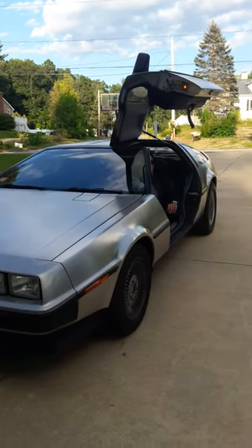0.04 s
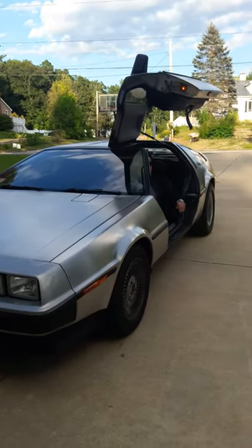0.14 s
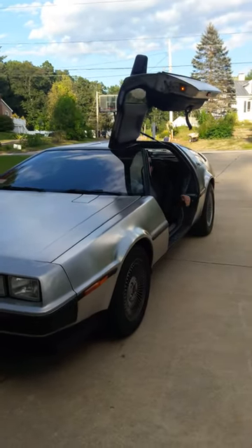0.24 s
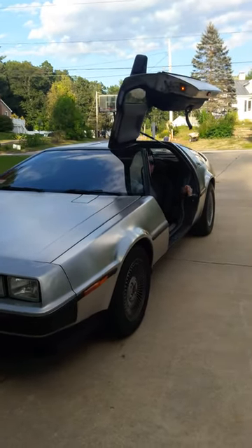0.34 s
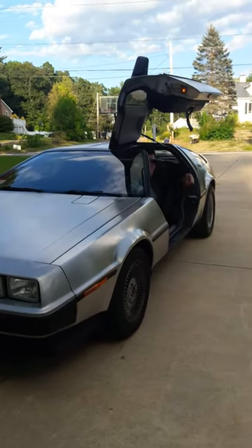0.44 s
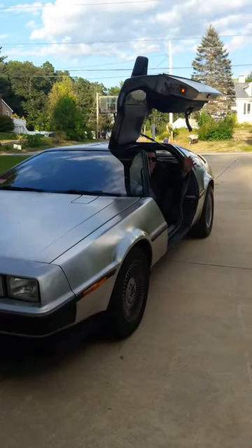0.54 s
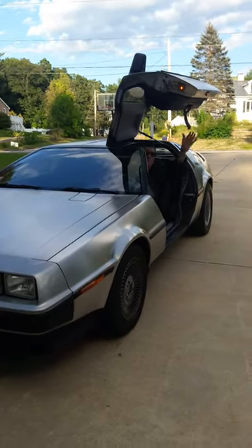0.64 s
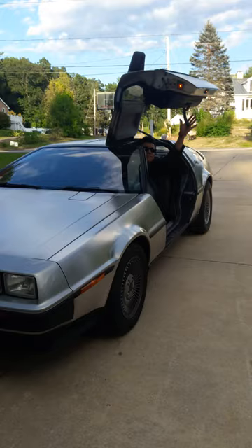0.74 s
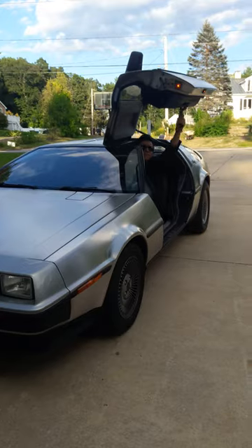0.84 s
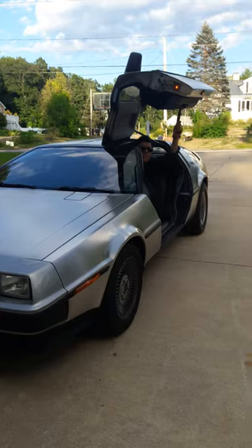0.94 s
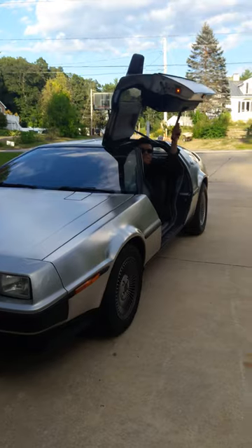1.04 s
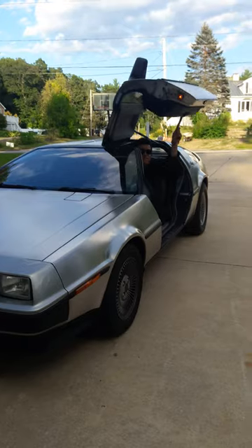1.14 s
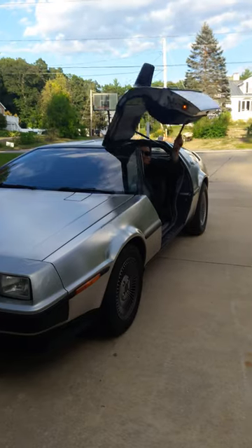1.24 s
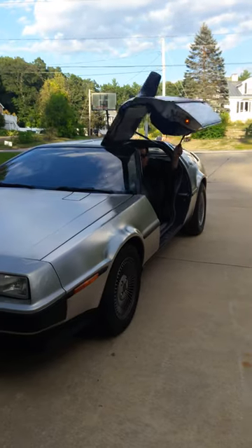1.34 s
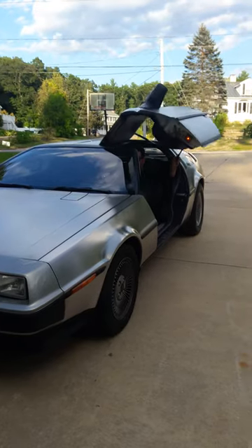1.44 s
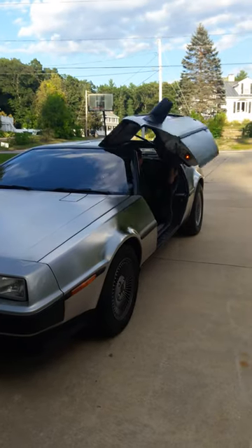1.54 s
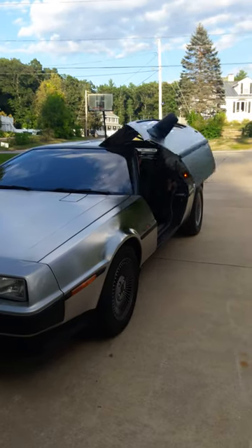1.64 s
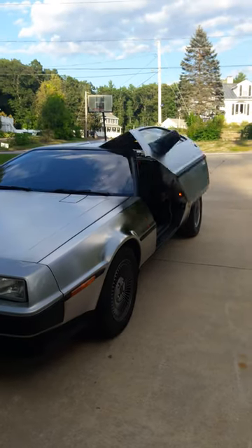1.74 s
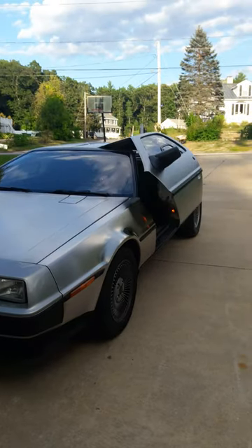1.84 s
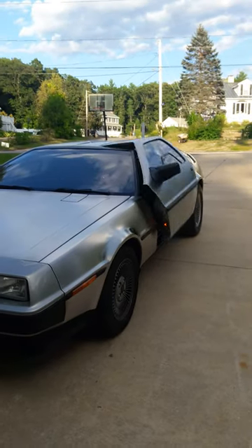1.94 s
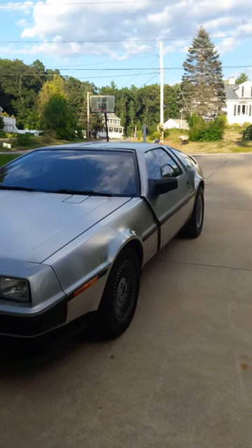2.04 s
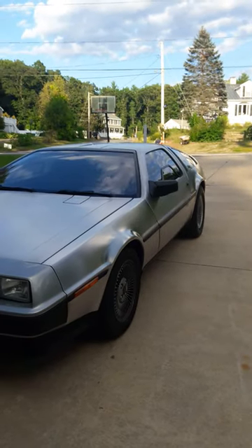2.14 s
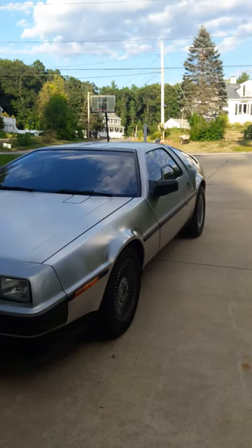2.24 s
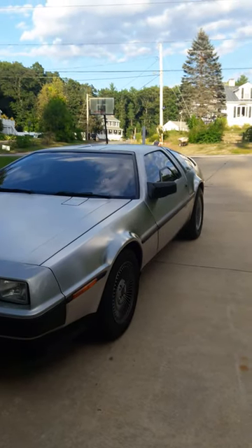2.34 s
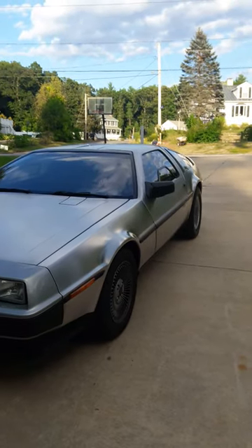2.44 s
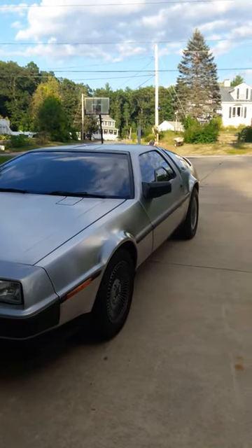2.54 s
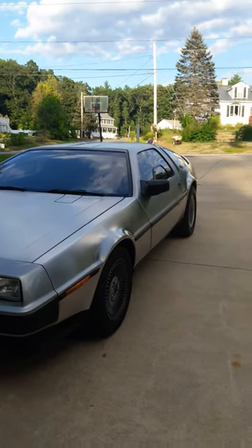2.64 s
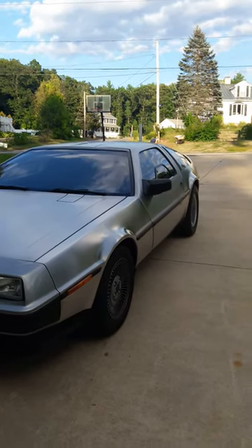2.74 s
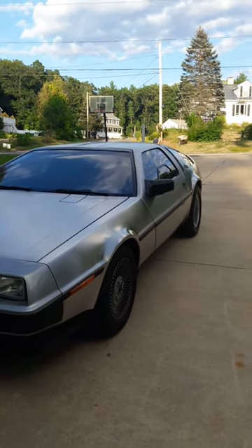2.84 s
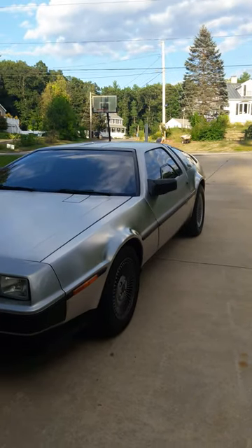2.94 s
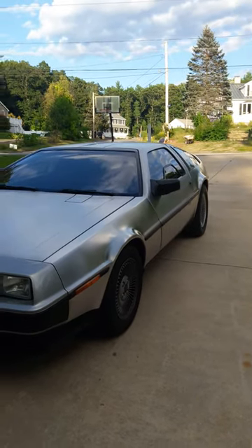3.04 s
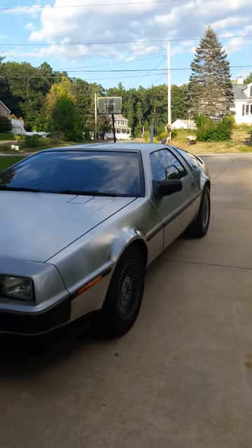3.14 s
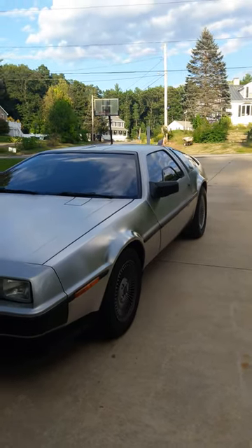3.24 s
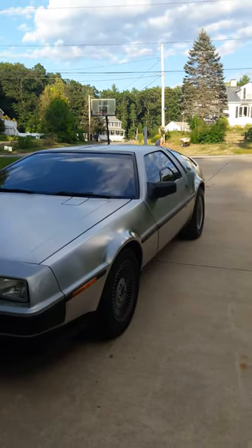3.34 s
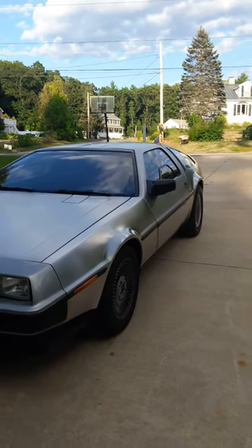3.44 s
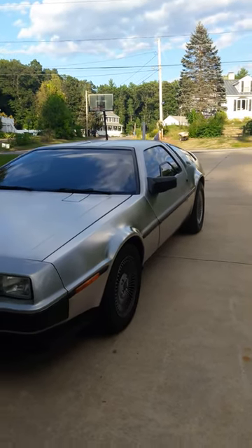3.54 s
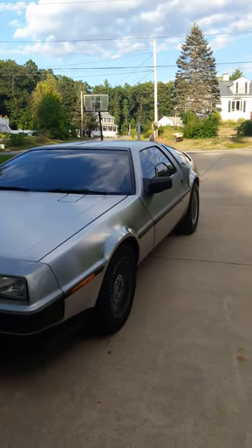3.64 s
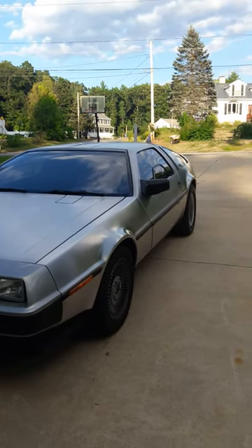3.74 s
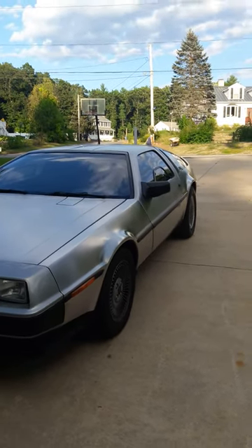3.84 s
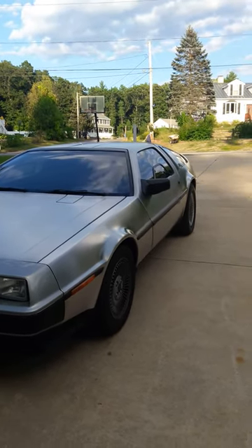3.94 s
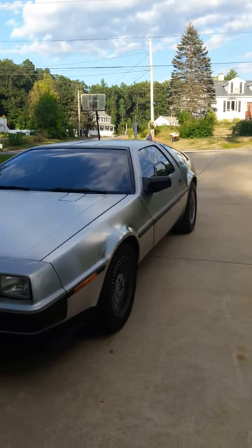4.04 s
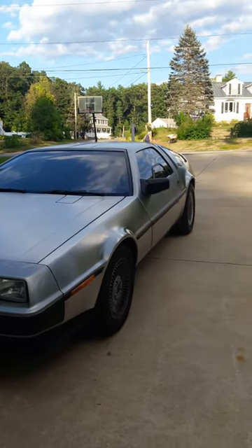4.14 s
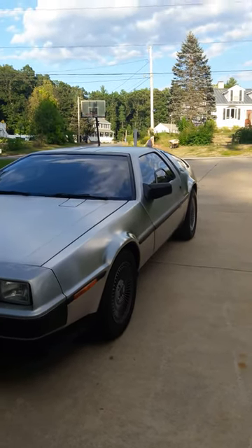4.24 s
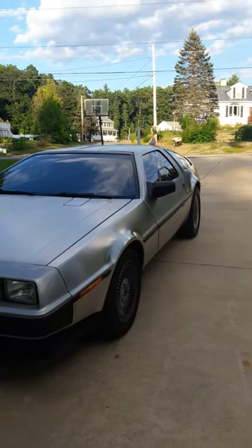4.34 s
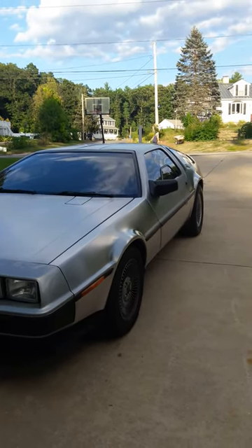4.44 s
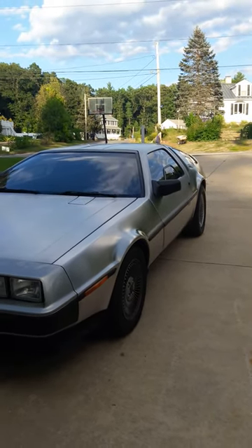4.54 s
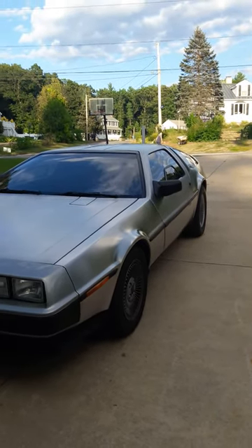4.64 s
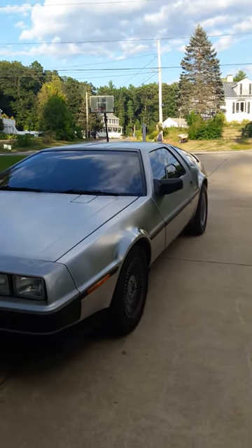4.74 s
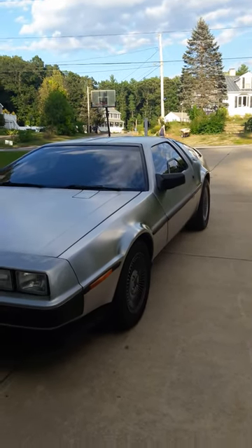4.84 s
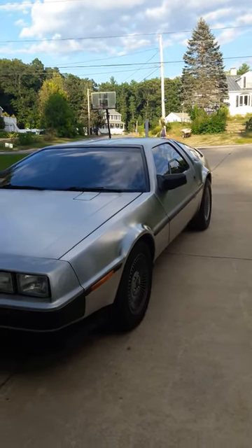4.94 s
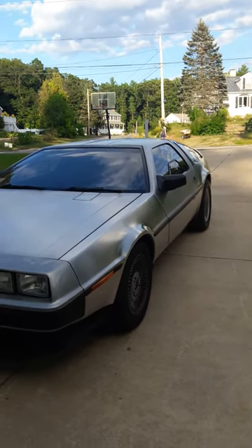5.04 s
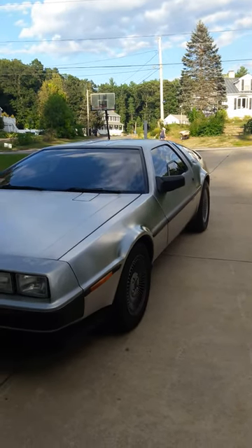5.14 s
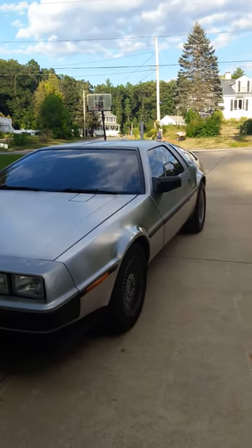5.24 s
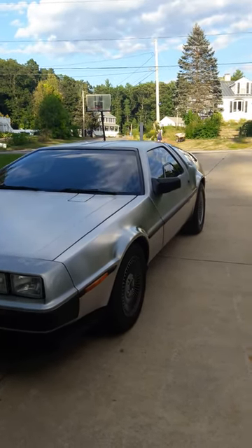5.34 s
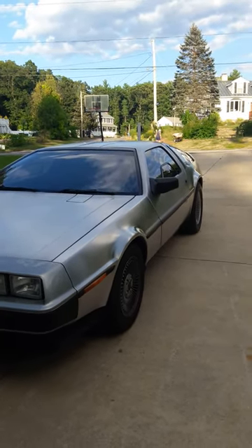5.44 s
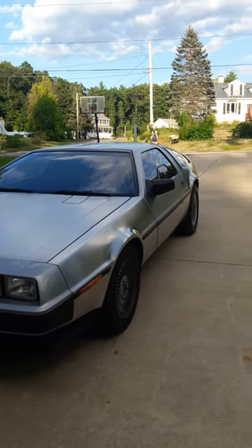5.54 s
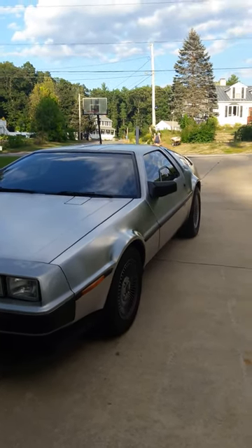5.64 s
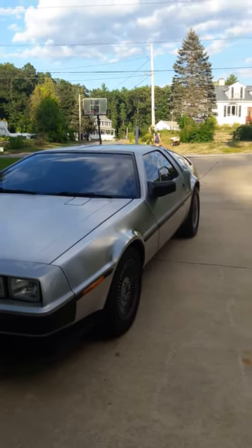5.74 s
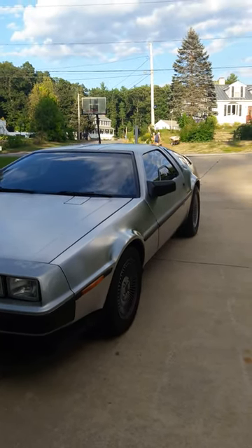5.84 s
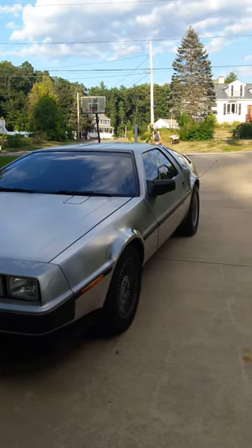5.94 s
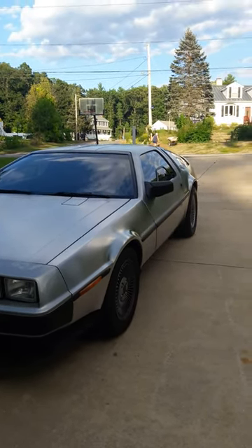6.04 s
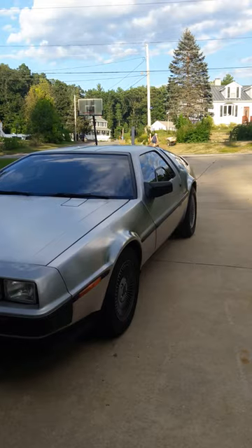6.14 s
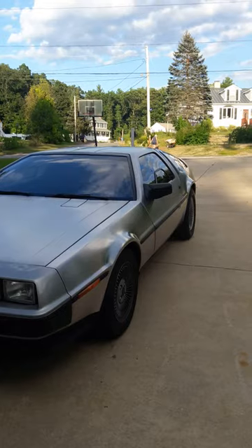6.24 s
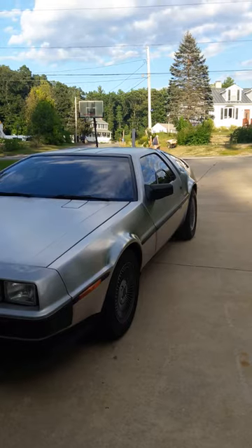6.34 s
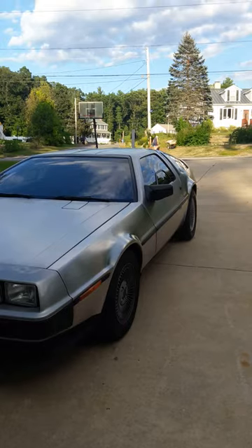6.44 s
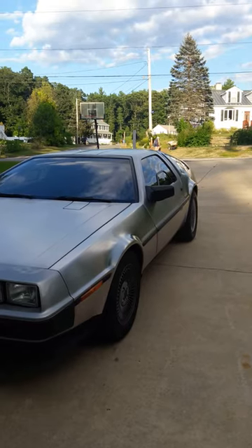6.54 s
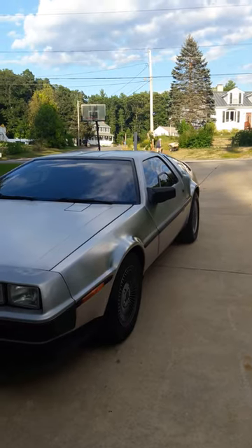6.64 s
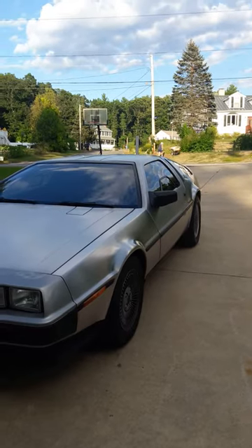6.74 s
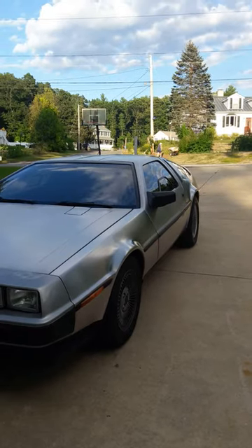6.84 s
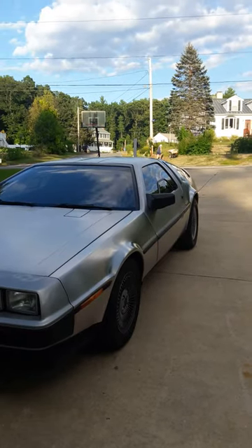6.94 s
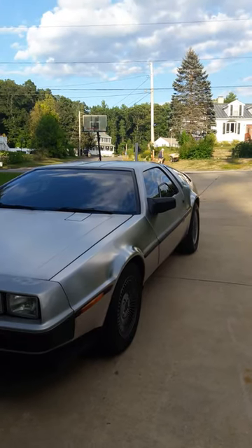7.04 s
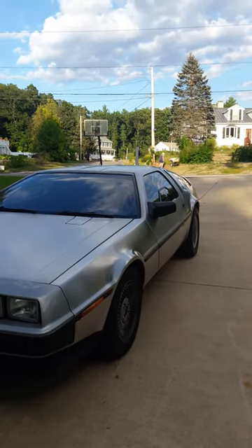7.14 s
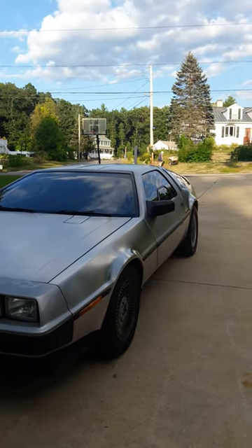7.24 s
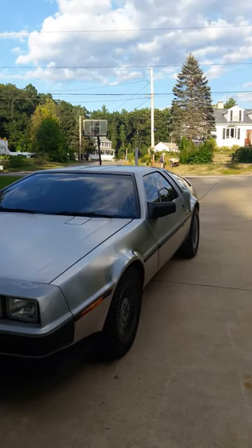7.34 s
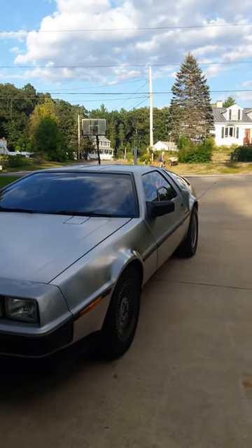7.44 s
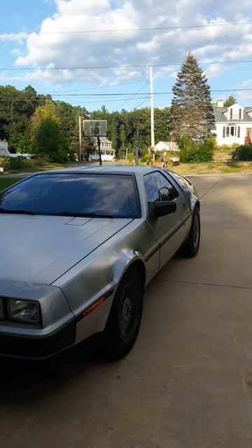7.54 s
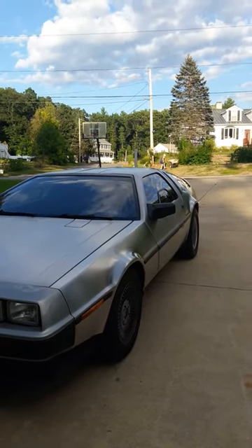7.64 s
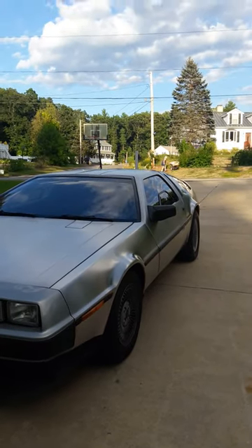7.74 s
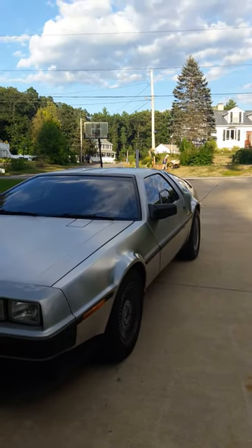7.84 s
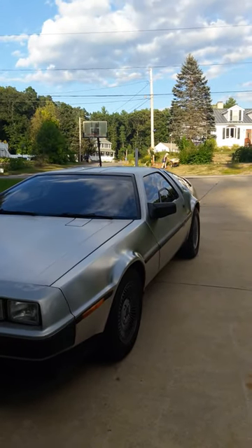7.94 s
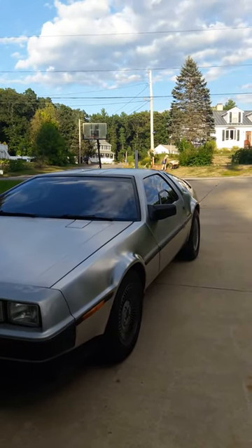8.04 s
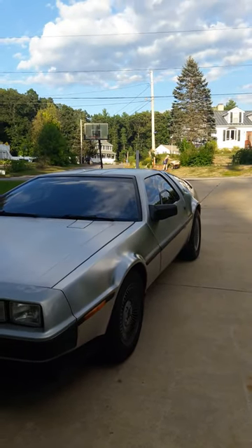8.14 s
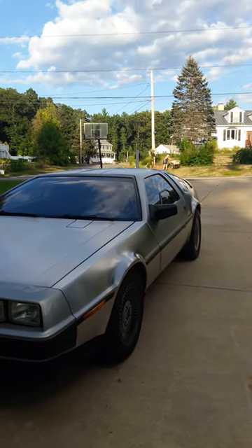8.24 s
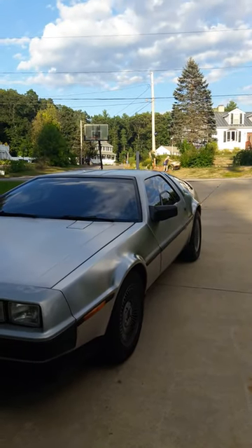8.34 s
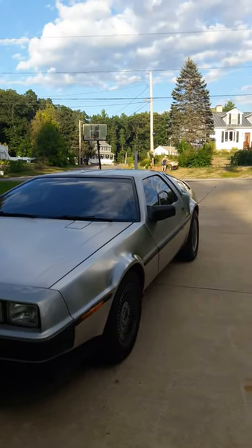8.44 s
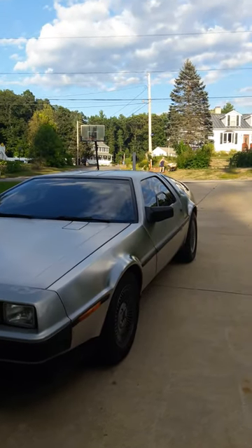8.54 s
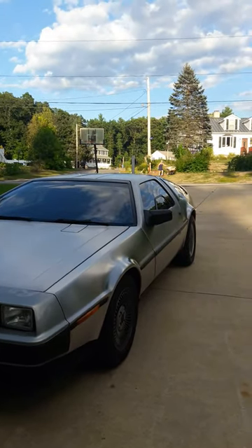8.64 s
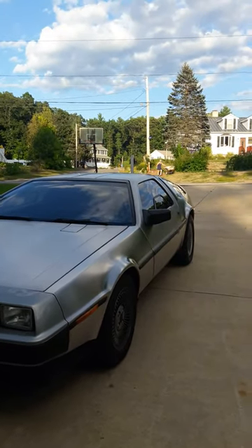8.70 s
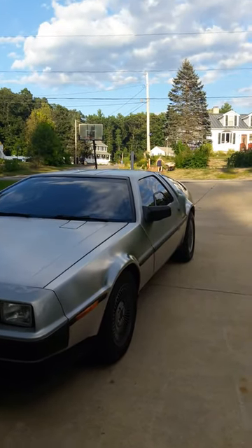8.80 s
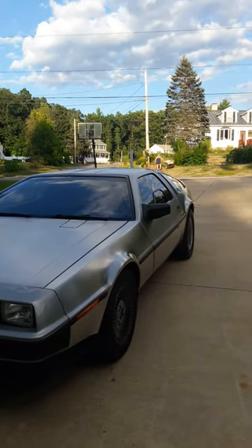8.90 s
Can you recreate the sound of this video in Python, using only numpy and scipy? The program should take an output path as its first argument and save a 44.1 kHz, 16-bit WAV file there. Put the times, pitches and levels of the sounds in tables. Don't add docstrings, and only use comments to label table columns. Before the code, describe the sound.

A dense evening insect chorus with a nearer chirping cricket runs throughout. After about a second, dry hinge creaks and seal rustle begin, ending in a massive multi-hit car door slam just after two seconds. Loose trim shudders, a sharp latch click and small ticks follow; the background dips briefly, then returns with thin bird whistles. Close stereo phone microphone outdoors.

```python
import sys
import numpy as np
from scipy import signal
from scipy.fft import rfft, irfft, next_fast_len
from scipy.io import wavfile
from scipy.ndimage import uniform_filter1d, map_coordinates

SR = 44100
rng = np.random.default_rng(int(sys.argv[2]) if len(sys.argv) > 2 else 0)


def gain_from_db(level_db):
    decades = np.asarray(level_db, float) / 20
    return 10 ** decades


def transcribe(u):
    v = np.clip(np.atleast_2d(u).T, -1, 1)
    q = np.round(v * 32767).astype(np.int16)
    wavfile.write(sys.argv[1], SR, q)


N = 395577

# f/Hz, likeness (1 = same)
ALIKE = [(60, 0.8205), (130, 1), (290, 0.82), (640, 0.77), (1410, 0.18), (3100, -0.11), (6820, -0.075),
         (15000, 0.19)]
# f/Hz, likeness
DOOR_ALIKE = [(60, 1), (180, 0.996), (550, 0.93), (1650, 0.099), (4970, 0.087), (15000, -0.24)]
SLAM_S = 2.114
LEFT_RIGHT = np.array([[1], [-1]])


def unit(x):
    return x / np.sqrt(np.mean(x ** 2) + 1e-20)


def along(points, hz):
    f, v = np.transpose(points)
    return np.interp(np.log(hz + 1), np.log(f + 1), v)


def wobble(rate):
    knots = rng.standard_normal(int(N * rate / SR) + 4)
    return map_coordinates(knots, [np.arange(N) * rate / SR])


def filtered(x, response):
    m = next_fast_len(x.shape[-1] + 4096)
    gain = response(np.fft.rfftfreq(m, 1 / SR))
    return irfft(rfft(x, m) * gain, m)[..., :x.shape[-1]]


def rush(spectrum, alike, size=N):
    def shape(hz):
        turn = np.arccos(np.clip(along(alike, hz), -1, 1)) / 2
        return gain_from_db(along(spectrum, hz)) * [np.cos(turn), np.sin(turn)]
    mid, side = filtered(rng.standard_normal((2, size)), shape)
    return unit(np.array([mid + side, mid - side]))


def fading(x, t60s):
    t, out = np.arange(x.shape[-1]) / SR, 0
    for hz in 62.5 * 2. ** np.arange(9):
        octave = lambda f: np.cos(np.pi / 2 * np.clip(np.log2((f + 1) / hz), -1, 1)) ** 2
        out = out + filtered(x, octave) * gain_from_db(-60 * t / along(t60s, hz))
    return out * (1 - np.exp(-t / 0.0014))


def add(track, s, sound):
    part = track[:, round(s * SR):][:, :sound.shape[-1]]
    part += sound[..., :part.shape[1]]


def lean(x, balance):
    return filtered(x, lambda hz: gain_from_db(along(balance, hz) / 2 * LEFT_RIGHT))


def glide(pitch, lead):
    return np.sin(2 * np.pi * np.cumsum(pitch) / SR + np.array([[0], [lead]]))


def slam():
    # t/s, panel level/dB, boom/dB and latch/dB against the panel
    contacts = [
        (2.1135, -21, -5, -26),
        (2.1162, -13, -6, -13.5),
        (2.134, -11, -4.5, -11.5),
        (2.1445, -12.5, 9, -7),
        (2.163, -14.5, -1, -8),
        (2.1855, -19, 12.5, -5),
        (2.206, -18, 1, -12),
        (2.258, -33.5, 1.5, -12.5),
        (2.329, -50, -7.5, -11.5),
        (2.38, -43, 7.5, -12.5),
    ]
    # f/Hz, level/dB, ring time/s (each contact fades 60 dB in 0.35 of it)
    shell_modes = [(68.8, -16.5, 0.99), (97.2, -3, .6), (120, -7.5, 0.55), (152.7, 3, 0.53),
                   (180.2, 2, 0.35), (226, -0.5, 0.39), (250, -8.5, 0.54), (272.4, -2, 0.43),
                   (315.77, -3, 0.3326), (411.3, -12, 0.59), (450, -13, 0.26)]
    # f/Hz, level/dB per Hz
    panel = [(260, -10.5), (450, -5), (558, -4.5), (734, -8.5), (821, -2.5), (1000, -11), (1180, -5.5),
             (1340, -11.5), (1480, -7.5), (2020, -13), (2220, -12), (3500, -24.5), (4550, -52.5),
             (7700, -120)]
    # f/Hz, level/dB per Hz
    latch_colour = [(1470, -49), (2500, -6.5), (3620, -6.5), (4570, -2.5), (5380, -6), (6680, -3.5),
                    (7620, -10), (8110, -16), (10600, -21), (12000, -20), (15900, -29.5)]
    # f/Hz, time to fade 60 dB/s
    dying = [(300, 0.21), (1000, 0.17), (3000, 0.078), (7000, 0.17), (10000, .15), (14000, 0.097)]
    shell, rattle, size = np.zeros((2, N)), np.zeros((2, N)), int(.9 * SR)
    t = np.arange(size) / SR
    for s, db, boom_db, latch_db in contacts:
        boom = 0
        for hz, level, t60 in shell_modes:
            fade = gain_from_db(level + rng.normal(0, 5.08) - 60 * t / (0.35 * t60))
            phase = rng.uniform(0, 6.3) + .1 * LEFT_RIGHT * np.sin(hz / 9)
            boom = boom + fade * np.sin(2 * np.pi * hz * t + phase)
        crack = 1 + 1.5 * gain_from_db(-60 * t / 0.021)
        latch = gain_from_db(latch_db) * crack * rush(latch_colour, DOOR_ALIKE, size=size)
        add(shell, s, gain_from_db(db + boom_db - 11) * boom * (1 - np.exp(-t / 0.0019)))
        add(rattle, s, gain_from_db(db - 5.0) * fading(rush(panel, DOOR_ALIKE, size=size) + latch, dying))
    crunch = gain_from_db(1.5 * wobble(260))
    return shell + rattle * crunch


def pings(rows, rise_s, lead):
    out, t = np.zeros((2, N)), np.arange(int(.08 * SR)) / SR
    for s, db, hz, t60 in rows:
        fade = gain_from_db(db + 1 - 60 * t / np.clip(t60, .003, .1)) * (1 - np.exp(-t / rise_s))
        add(out, s, fade * np.sin(2 * np.pi * hz * t + np.array([[0], [lead * hz / 1000]])))
    return out


def latch_bites():
    # t/s, peak level/dB, f/Hz, time to fade 60 dB/s
    bites = [(2.1168, -19, 2280, .03), (2.1205, -16.5, 1150, 0.02495), (2.12, -20.5, 110, .1),
             (2.126, -14, 160, .08), (2.136, -17, 105, .1), (2.228, -24, 105, .1), (2.14, -18, 440, .06),
             (2.118, -19, 4130, 0.022), (2.1175, -22, 7200, .02), (2.1195, -16.5, 1030, 0.045),
             (2.146, -13, 820, 0.0535), (2.149, -21, 1474, .04), (2.1475, -21, 360, .02),
             (2.165, -17, 790, .015), (2.162, -19.5, 1171, 0.048), (2.164, -18.5, 543, 0.06),
             (2.204, -28, 621.3, 0.054), (2.205, -28, 1075, .04), (2.218, -16, 253, 0.06),
             (2.195, -17, 160, .08), (2.272, -39, 600, 0.057), (2.196, -24.5, 7447, .01),
             (2.1345, -18, 6480, .03), (2.1395, -20.5, 7300, .015), (2.1445, -19, 4594, 0.027),
             (2.1448, -19, 6518, .03), (2.1645, -28, 4710, 0.017), (2.1855, -18, 6170, 0.017),
             (2.186, -22, 7500, .02), (2.187, -27, 5200, .015), (2.258, -42.5, 5067, 0.0285),
             (2.1, -46.5, 2100, 0.03402), (2.6183, -22.5, 6800, 0.0037), (2.6184, -36, 8600, .004),
             (2.6191, -36, 9200, .004), (2.6184, -35, 4450, .004), (2.6191, -38, 4100, .004),
             (2.6195, -50, 780, 0.046), (2.6191, -42, 10800, .004), (2.6184, -46, 1800, .005),
             (2.6184, -37, 10300, .004), (2.6184, -40, 12200, .004), (2.6184, -50, 14300, .004),
             (2.6191, -21, 7140, 0.0045), (2.6185, -33, 5343, 0.0088), (2.6186, -41.5, 3780, 0.01036),
             (2.6186, -45, 2726, 0.01215), (2.6205, -43, 5800, .01), (2.4, -43.5, 4960, 0.010306),
             (2.629, -49, 1165, 0.0318), (2.4, -43, 4300, .006), (2.6343, -34, 5800, .006)]
    return pings(bites, rise_s=0.00051, lead=0.19) * gain_from_db(2.0 * wobble(400))


def creaks():
    # t/s, peak level/dB, low knock/dB
    slips = [(1.054, -49, -9), (1.073, -45.5, -10), (1.107, -60, 0), (1.149, -51, -1), (1.174, -47.5, -4.5),
             (1.19, -46.5, -11), (1.208, -48.5, -8), (1.23, -48, -11.5), (1.327, -49.5, -5.5),
             (1.433, -48.5, -0.5), (1.465, -69.5, 13.5), (1.571, -45.5, 0), (1.612, -54.5, -1),
             (1.682, -45.5, 2.5), (1.742, -49, -5.5), (1.784, -43, -9.5), (1.819, -54.5, -5.5),
             (1.866, -61, -16), (1.962, -42, -5.5), (2.014, -49.5, -3), (2.06, -54, -12.5)]
    # f/Hz, width/Hz, level/dB
    hinge_modes = [(327, 165.51, 1.5), (445, 153, 3), (687, 206, -0.5), (1170, 180, -4.5),
                   (1630, 100, -2.5)]
    edge_colour = [(1800, -25.5), (2800, -6.5), (6000, -6), (12000, -29.0), (15000, -49)]  # f/Hz, level/dB
    squeak_db, edge_db = -9.5, -10.5
    out, size = np.zeros((2, N)), int(.1 * SR)
    t = np.arange(size) / SR
    for s, db, knock_db in slips:
        fade = (gain_from_db(-60 * t / 0.048) + 0.31 * gain_from_db(-60 * t / 0.27)) * (1 - np.exp(-t / .0008))
        jolts = rush([(100, 0), (15000, 0)], DOOR_ALIKE, size=size) * fade
        weight = [(500, knock_db + 7.0), (650, 0), (1250, 0), (1500, squeak_db + 6.0)]

        def hinge(f):
            total = 0
            for k, (c, w, level) in enumerate(hinge_modes):
                ring = 1j * f * w / (c * c - f * f + 1j * f * w)
                total = total + (-1) ** k * gain_from_db(level + along(weight, c)) * ring
            return total

        edge = filtered(jolts, lambda f: gain_from_db(along(edge_colour, f)))
        add(out, s, gain_from_db(db + 14.5) * filtered(jolts, hinge) + gain_from_db(db + edge_db + 12.0) * edge)
    return out


def squeaks():
    # t/s, peak level/dB, f/Hz, time to fade 60 dB/s
    seal = [(1.067, -52, 500, .03), (1.074, -42, 1170, 0.03), (1.075, -54.5, 1700, .03),
            (1.19, -46, 1630, .03), (1.191, -45, 727.2, 0.0345), (1.23, -44.5, 1597, 0.0387),
            (1.232, -40.5, 700, .03), (1.328, -50, 1699, 0.0358), (1.431, -48.5, 1766, 0.02313),
            (1.571, -51.5, 3750, 0.027), (1.575, -42.5, 400, 0.051), (1.432, -45.5, 620, 0.046),
            (1.463, -47, 450, .05), (1.866, -49.5, 900, 0.032), (1.633, -48.5, 979.7, 0.031),
            (1.682, -48, 1680, 0.0413), (1.741, -44.5, 1760, 0.02677), (1.785, -51.5, 3530, 0.03223),
            (1.799, -55.5, 2800, .02), (1.962, -50.5, 1736, .03), (1.962, -48, 2550, 0.0243),
            (1.962, -45, 800, 0.0324), (1.973, -41.5, 690, 0.041), (2.014, -51, 1670, 0.03536),
            (2.06, -51.5, 1688, .03)]
    return pings(seal, rise_s=0.0008, lead=0.52)


def rub():
    # t/s, level/dB
    drag = [(1.03, -83.5), (1.07, -55), (1.12, -63), (1.15, -57), (1.19, -55), (1.25, -60), (1.3, -88),
            (1.5, -73), (1.58, -57), (1.8, -57.5), (1.9, -75), (2.1, -61.5), (2.12, -95)]
    body = [(150, -26), (330, 2.5), (700, -3), (1170, -4.5), (1650, -11.5), (2200, -22), (6000, -35), (9000, -58)]
    level_db = np.interp(np.arange(N) / SR, *np.transpose(drag), left=-120, right=-120)
    return gain_from_db(level_db + 2.9 * wobble(70)) * rush(body, DOOR_ALIKE)


def ticks():
    # t/s, peak level/dB, bright part/dB, left minus right/dB
    snaps = [(2.6191, -49, 10.5, -3.5), (2.6222, -59, 8, 0), (2.6272, -59, 7, -3), (2.6315, -61, 9, -2),
             (2.651, -51, -14.5, -4), (2.8536, -47.5, -7, -4), (2.8934, -45.5, -10.5, -2.5),
             (2.9142, -47.5, -10.5, -10), (2.9172, -54, -8, -8), (2.838, -56, -15, -3),
             (2.972, -58, -15, -4), (3.411, -58, -6, -6), (3.384, -54.5, -16.5, -8.5),
             (3.0335, -51, -15, -1), (3.3872, -51.5, -18.5, -7), (3.469, -46.5, -19.5, -10.5),
             (3.583, -41, -9.5, -10.5), (3.5904, -68, -1.5, -5), (3.6094, -72, 1.5, -3.5),
             (4.854, -65, 8, -1.5)]
    click_tones = [(1250, -9), (2200, 1.5), (2750, -2.0), (4300, -4.5)]
    bright = [(2500, -2.5), (4300, -21.0), (6500, 11.5), (9000, -8.5), (13000, -22.5), (15500, -32)]
    out, t = np.zeros((2, N)), np.arange(int(0.028 * SR)) / SR
    for s, db, bright_db, pan_db in snaps:
        click = sum(gain_from_db(level - 60 * t / 0.0043) * np.sin(2 * np.pi * hz * t) for hz, level in click_tones)
        click = click * (1 - np.exp(-t / 0.00015))
        crack = rush(bright, DOOR_ALIKE, size=len(t)) * gain_from_db(bright_db + 5.5 - 60 * t / 0.0082)
        add(out, s - .0005, gain_from_db(db + 1.5 + pan_db / 2 * LEFT_RIGHT) * (click + crack))
    return out


def hum():
    after = np.clip(np.arange(N) / SR - SLAM_S, 0, None)
    return gain_from_db(-59.5 - 60 * after / 4.0 + 3.5 * wobble(13)) * np.sin(2 * np.pi * 294.21 * after)


def knocks():
    # t/s, peak level/dB, f/Hz
    hand = [(0.004, -42, 110), (.045, -44, 55), (.105, -48, 65), (0.153, -43, 104.7), (.242, -42.5, 50),
            (.328, -43, 70), (0.22, -44, 91), (0.279, -34, 91.23), (0.297, -39, 140.1), (0.376, -40, 98.33),
            (0.469, -39, 126.6), (0.482, -36.5, 84.6)]
    # t/s, peak level/dB, f/Hz
    taps = [(0.195, -46, 652.4), (0.216, -45, 399.2), (0.408, -45, 273), (0.632, -43.5, 283),
            (0.848, -42, 300.7), (0.939, -47, 226), (2.66, -51, 250), (2.72, -49, 230), (2.826, -48, 250),
            (2.848, -48.5, 271), (4.095, -44.5, 250), (7.483, -45, 910), (7.59, -43, 85), (7.603, -39, 240),
            (7.606, -49, 400), (7.89, -48, 192), (8.309, -42, 334), (8.591, -47.5, 180), (8.839, -44, 250)]
    # t/s, peak level/dB, f/Hz
    shudder = [
        (2.232, -21, 62),
        (2.29, -31, 100),
        (2.327, -26.5, 193),
        (2.377, -31, 226),
        (2.398, -31, 97),
        (2.467, -37, 85.4),
        (2.55, -46, 160),
        (2.65, -44, 110.3),
        (2.69, -47.5, 165),
        (2.835, -43.5, 148),
    ]
    out, t = np.zeros((2, N)), np.arange(int(.2 * SR)) / SR
    for rows, pan_db in [(hand, 15), (taps + shudder, 1.5)]:
        for s, db, hz in rows:
            t60 = 0.062 * (100 / hz) ** 0.359
            dull = [(hz / 2, -12), (hz, 0), (4 * hz, -9), (16 * hz, -34), (48 * hz, -120)]
            puff = gain_from_db(-14.5) * rush(dull, DOOR_ALIKE, size=len(t))
            fade = gain_from_db(db + 5.0 - 60 * t / np.clip(t60, .01, 1)) * (1 - np.exp(-t / 0.00377))
            add(out, s, gain_from_db(pan_db / 2 * LEFT_RIGHT) * fade * (np.sin(2 * np.pi * hz * t) + puff))
    return out


def yard(x):
    # f/Hz, time to fade 60 dB/s
    echo_fade = [(100, 0.81), (250, 0.86), (1000, 0.7566), (4500, 0.67), (7000, .75), (14000, 0.29)]
    tail = fading(rush([(50, 0.5), (300, -7.5), (8000, 0.0), (15000, 3.0)], DOOR_ALIKE, size=SR), echo_fade)
    late = np.pad(x.mean(0), (1500, 0))[None]
    return signal.fftconvolve(late, tail / np.linalg.norm(tail[0]), axes=1)[:, :N]


def cricket():
    chirps = [.092, .433, .882, 1.325, 1.719, 2.661, 3.087, 3.789, 4.122, 4.486, 4.865, 5.212, 5.559, 5.948,
              6.437, 6.751, 7.119, 7.51, 7.847, 8.234, 8.626]
    out, t = np.zeros((2, N)), np.arange(int(0.037 * SR)) / SR
    stroke = np.sin(2 * np.pi * (4240 * t - 1500 * t * t) + np.array([[0], [1.5]])) * np.hanning(len(t))
    levels = rng.normal(-15, 1.2, (len(chirps), 3))
    for s, stroke_db in zip(chirps, levels):
        for k in range(3):
            db = 9.0 - 2.0 * (k == 0) + stroke_db[k]
            add(out, s - .014 + .045 * k, gain_from_db(db + 1.2 * LEFT_RIGHT) * stroke)
    return out


def bird():
    # t/s, start f/Hz, end f/Hz, arch/Hz, level/dB
    song = [
        (3.68, 3540, 3600, 60, -74),
        (3.7, 3180, 3230, 60, -77),
        (3.83, 3200, 3330, -40, -77),
        (3.925, 3520, 3400, 300, -73),
        (3.96, 3400, 3350, -60, -78),
        (4.127, 3600, 3700, 90, -74),
        (4.16, 3420, 3480, -130, -72),
        (4.41, 3200, 3330, 120, -75),
        (4.408, 3620, 3480, 90, -76),
    ]
    out, waver = np.zeros((2, N)), 40 * wobble(27) + 40 * wobble(70)
    u = np.linspace(0, 1, int(0.142 * SR))
    for s, start_hz, end_hz, arch_hz, db in song:
        pitch = start_hz + (end_hz - start_hz) * u + arch_hz * np.sin(np.pi * u) ** 0.71
        pitch = pitch + waver[round(s * SR + start_hz):][:len(u)]
        add(out, s, gain_from_db(db + 8.5) * glide(pitch, 1.6) * np.sin(np.pi * u) ** 0.35)
    return out * gain_from_db(-6 + 4 * wobble(40))


def whistles():
    # t/s, length/s, start f/Hz, end f/Hz, level/dB
    glides = [
        (1.118, 0.048, 9480, 9750, -84.5),
        (1.986, .018, 3216, 3474, -73.5),
        (1.996, .014, 3450, 3050, -74.5),
        (2.734, 0.17, 8950, 8500, -85),
        (3.875, 0.04, 7400, 7950, -72),
        (5.774, 0.054, 9270, 8339, -77.5),
        (6.025, 0.0342, 8970, 8140, -78),
        (7.233, 0.07576, 7853, 7634, -67),
        (7.358, 0.048, 9300, 9041, -82),
    ]
    out = np.zeros((2, N))
    for s, length, start_hz, end_hz, db in glides:
        u = np.linspace(0, 1, int(length * SR))
        pitch = start_hz + (end_hz - start_hz) * u ** 1.4
        add(out, s, gain_from_db(db + 6.5) * glide(pitch, 1.2) * np.abs(np.sin(np.pi * u)) ** 0.19)
    return (out + phrases()) * gain_from_db(1.8 * wobble(40))


def phrases():
    # t/s, f/Hz, level/dB
    songs = [
        [(1.165, 8480, -92), (1.2, 8530, -79), (1.25, 8470, -79), (1.28, 8290, -80), (1.315, 8190, -82),
         (1.345, 8290, -80), (1.385, 8010, -80), (1.42, 7870, -83), (1.435, 7850, -95)],
        [(3.97, 9480, -90), (4.012, 9620, -78), (4.06, 9400, -79), (4.132, 9130, -75.5), (4.15, 9380, -75),
         (4.2, 9560, -77), (4.235, 9330, -76), (4.312, 8350, -76), (4.322, 8250, -92)],
    ]
    out = np.zeros((2, N))
    for rows in songs:
        s, hz, db = np.transpose(rows)
        t = np.arange(s[0], s[-1], 1 / SR)
        pitch = uniform_filter1d(np.interp(t, s, hz), size=500)
        add(out, s[0], gain_from_db(np.interp(t, s, db) + 5.5) * glide(pitch, 1.2))
    return out


def flutter_bursts():
    # t/s, length/s, centre f/Hz, level/dB against the chorus
    bursts = [(1.088, 0.103, 8860, -19.5), (3.95, 0.1105, 12900, -26), (4.22, 0.133, 8790, -22),
              (1.248, .12, 9300, -25), (5.603, 0.13, 8600, -21), (5.93, .05, 8700, -22),
              (5.599, 0.127, 12800, -30), (5.8, 0.07, 8800, -17), (5.853, .1, 12050, -30),
              (6.06, 0.058, 8600, -19), (7.2, .06, 12940, -25), (7.348, 0.1223, 8800, -21),
              (8.75, .07, 12000, -30.5), (8.75, 0.093, 8500, -21)]
    wide = 500
    out, flutter = np.zeros((2, N)), gain_from_db(3.5 * wobble(45))
    for s, length, hz, db in bursts:
        t = np.arange(-3 * length, 3 * length, 1 / SR)
        band = [(hz - 2 * wide, -30), (hz - wide, -5), (hz, 0), (hz + wide, -5), (hz + 2 * wide, -30)]
        noise = rush([(10, -120)] + band + [(20000, -120)], ALIKE, size=len(t))
        add(out, s + t[0], gain_from_db(db) * np.exp(-(t / length) ** 2) * noise)
    return out * flutter


def far_choir():
    # f/Hz, level/dB per Hz
    colour = [(3950, -40.5), (4200, -13.5), (4400, -4), (4600, -5.5), (4780, -17), (5100, -50)]
    # t/s, level/dB
    strength = [(0, -0.5), (3.5, -3.5), (4.5, -0.5), (5.2, -0.5), (6.3, 0), (7, 1), (7.5, 1.5), (8.97, 1.5)]
    swells = [0, .39, .83, 1.21, 1.6, 2.0, 2.5, 2.93, 3.3, 3.65, 4.09, 4.36, 4.72, 5.02, 5.27, 5.67, 5.95,
              6.34, 6.63, 7.01, 7.44, 7.83, 8.2, 8.55, 8.95]
    t = np.arange(N) / SR
    swell_db = 6 * (sum(np.exp(-((t - s) / 0.1) ** 2) for s in swells) - .6)
    level_db = -12.0 + np.interp(t, *np.transpose(strength)) + swell_db
    return gain_from_db(level_db + .3 * wobble(1.3) + 1.2 * wobble(45)) * rush(colour, ALIKE)


def gain_db():
    t = np.arange(N) / SR
    after, later = np.clip(t - SLAM_S, 0, None), np.clip(t - 3.38, 0, None)
    return -4 * (1 - np.exp(-after / 0.62)) * np.exp(-later / 0.29)


def air():
    # t/s, level/dB
    road = [(0, -57), (.8, -58), (1.8, -56), (2.8, -58.5), (5.5, -59.5), (7.6, -58), (8.97, -57)]
    # f/Hz, level/dB per Hz
    rumble = [(20, -25), (45, -4), (100, 1.5), (180, -1), (260, -7), (400, -11), (700, -11), (1100, -11),
              (1700, -17), (2900, -22), (5200, -22), (7600, -20.5), (8000, -47.5), (16000, -64)]
    # f/Hz, level/dB per Hz
    high = [(5300, -44), (5800, -10.5), (6300, -1), (7000, -1.5), (7600, -12), (8000, -69.5)]
    # f/Hz, level/dB per Hz
    low = [(2900, -43), (3200, -2), (3400, -2), (3800, -38.5)]
    # f/Hz, level/dB per Hz
    mic = [(7000, -36.5), (8200, -7), (9000, -1), (10000, -11), (10600, -11), (13000, -9.5), (15700, -9),
           (16000, -73)]
    # f/Hz, left minus right/dB
    balance = [(60, 2), (180, 0.5), (550, 1.5), (1650, 0), (4970, 0), (15000, -11.5)]
    road_db = np.interp(np.arange(N) / SR, *np.transpose(road))
    traffic = gain_from_db(road_db + 2.0 + 0.5 * wobble(4.7)) * rush(rumble, ALIKE)
    chorus = gain_from_db(2.5 + 0.19 * wobble(7.3) + 0.96 * wobble(55)) * rush(high, ALIKE)
    near = gain_from_db(1.3 * wobble(90) + .6 * wobble(2.2)) * cricket()
    hiss = gain_from_db(-23 + .6 * wobble(3.7)) * rush(mic, ALIKE)
    drone = gain_from_db(-19 + 1.2 * wobble(2.1)) * rush(low, ALIKE)
    chorus_level = gain_from_db(-60)
    insects = chorus_level * (chorus + far_choir() + drone + near + gain_from_db(-6) * yard(near))
    return gain_from_db(gain_db()) * (lean(traffic + insects, balance) + chorus_level * (hiss + flutter_bursts()))


def scene():
    # f/Hz, left minus right/dB
    door_lean = [(60, 2), (130, -1.5), (290, 1.5), (640, 3), (1410, 1.5), (3100, 4.5), (6820, -7),
                 (15000, 2)]
    car = lean(slam() + creaks() + squeaks(), door_lean) + ticks()
    far, thin = bird(), whistles()
    echo = gain_from_db(-14.5) * yard(car) + yard(gain_from_db(-5) * far + gain_from_db(-7.5) * thin)
    close = car + latch_bites() + lean(rub(), door_lean) + hum() + knocks()
    return close + far + thin + echo + air()


def low_pass(x):
    return signal.sosfilt(signal.butter(12, 16250, fs=SR, output="sos"), x)


def record(dry):
    heard = filtered(dry, lambda hz: (1j * hz / (55 + 1j * hz)) ** 2 * (hz < 15750))
    ceiling = 0.9
    heard = heard / (1 + np.abs(heard / ceiling) ** 6) ** (1 / 6)
    return low_pass(heard - .0006)


dry = scene()
out = record(dry)
transcribe(out)
```